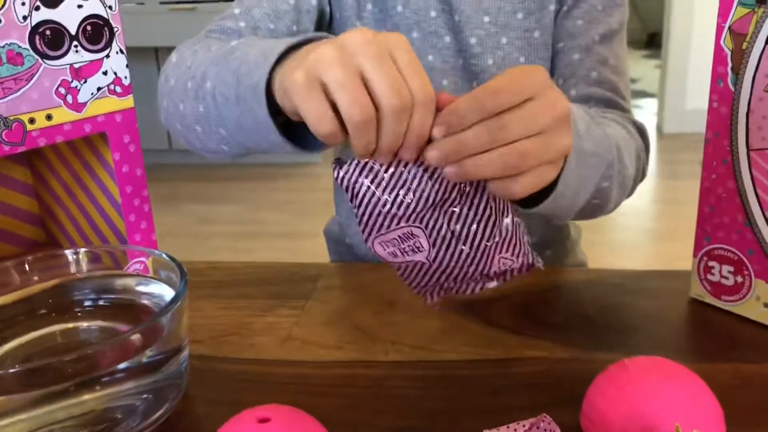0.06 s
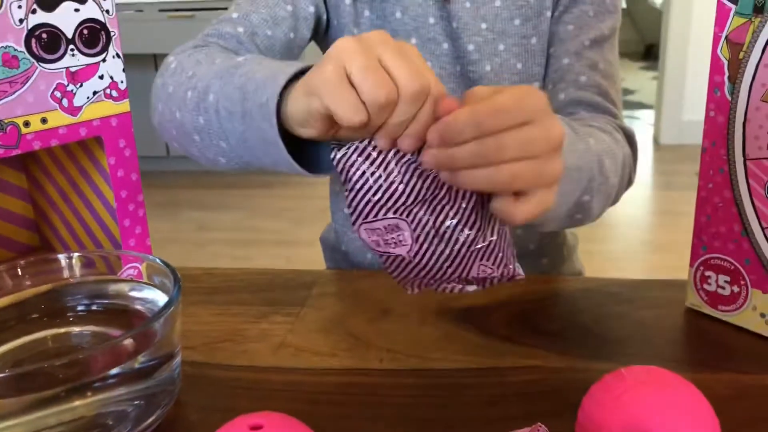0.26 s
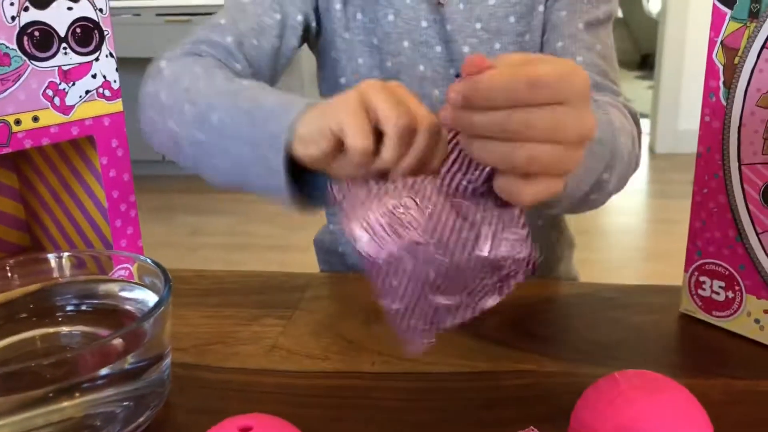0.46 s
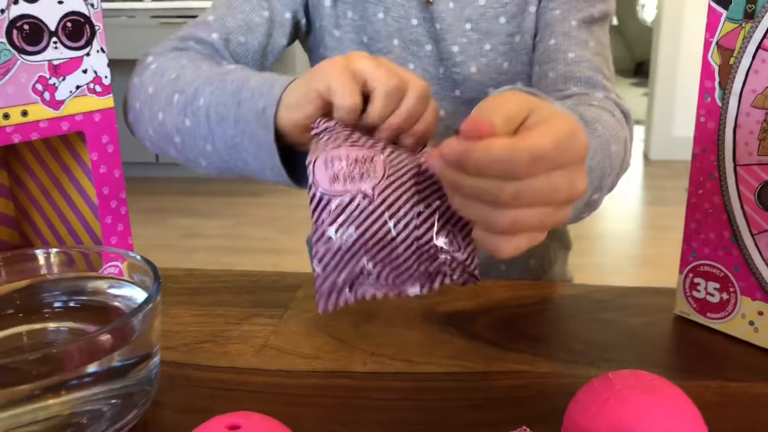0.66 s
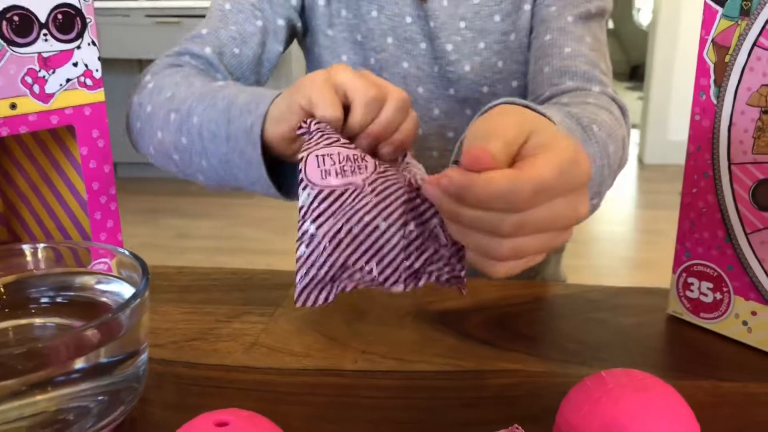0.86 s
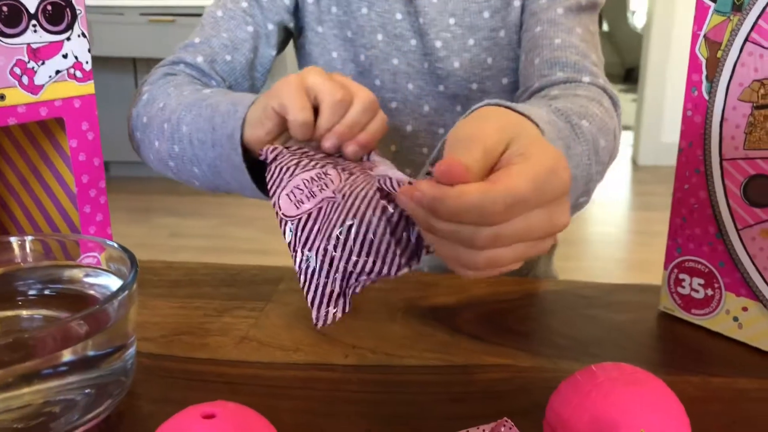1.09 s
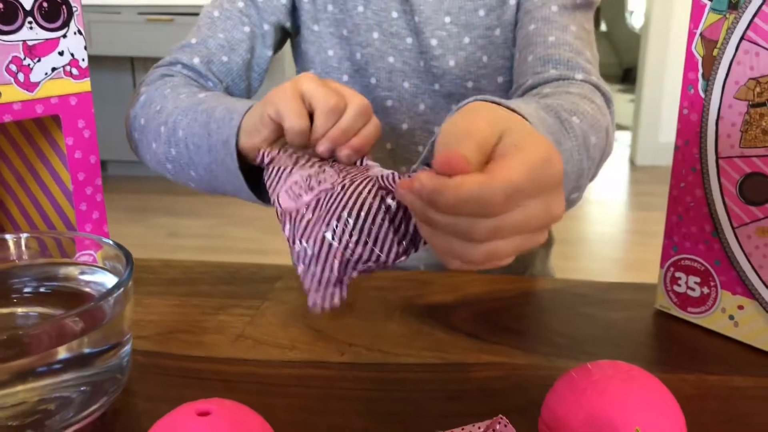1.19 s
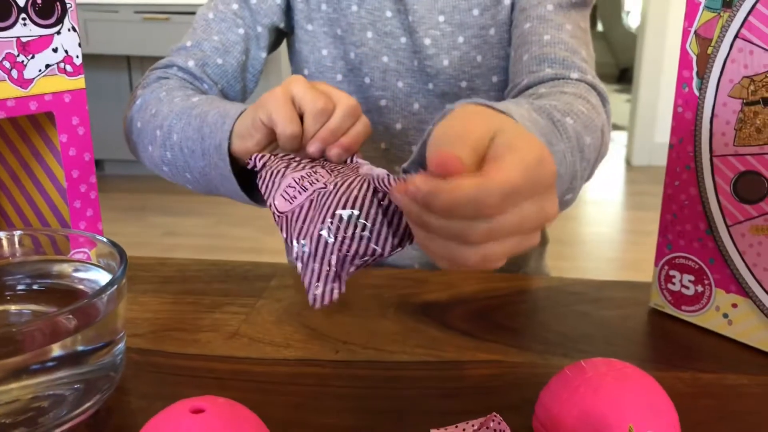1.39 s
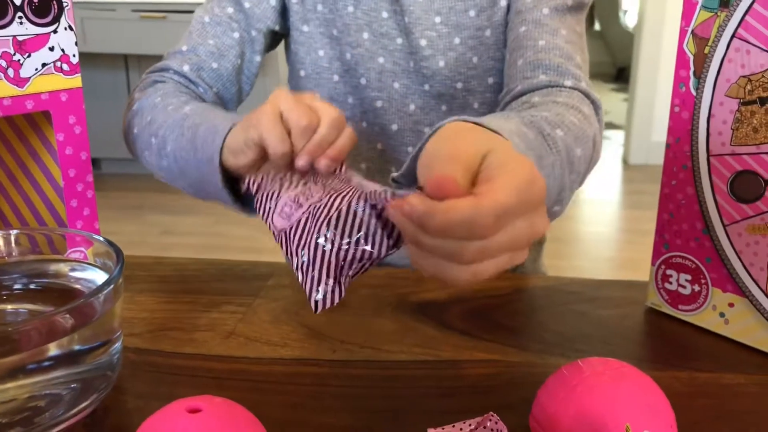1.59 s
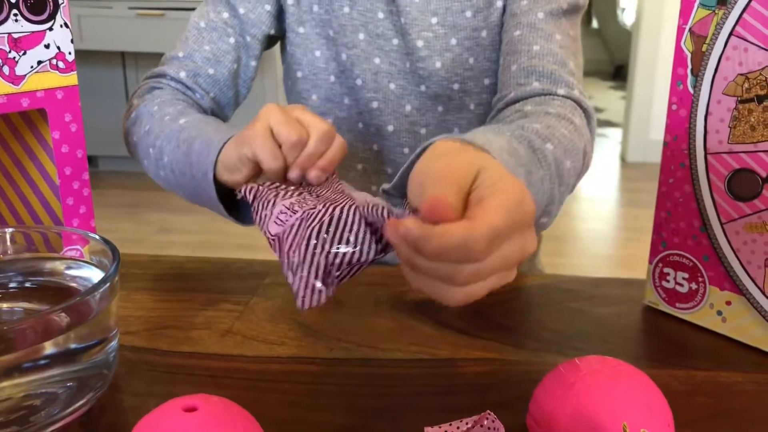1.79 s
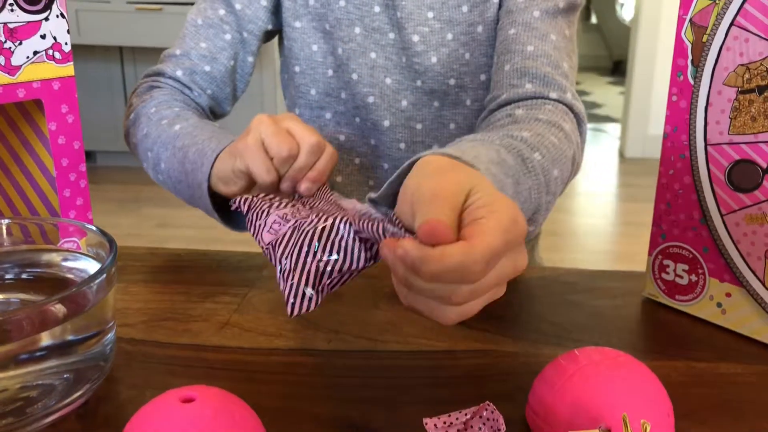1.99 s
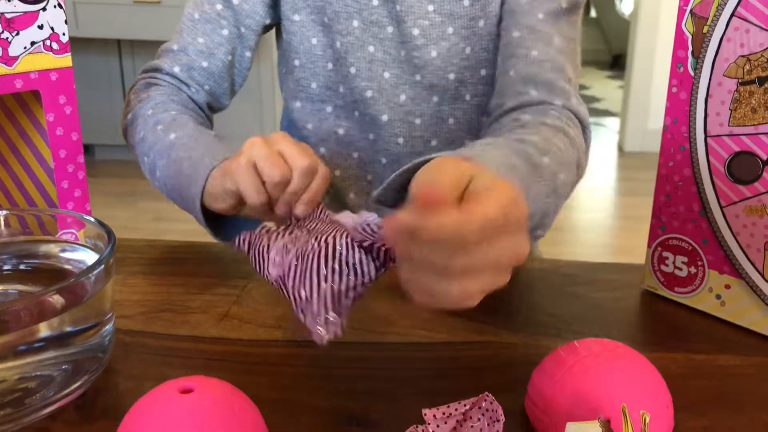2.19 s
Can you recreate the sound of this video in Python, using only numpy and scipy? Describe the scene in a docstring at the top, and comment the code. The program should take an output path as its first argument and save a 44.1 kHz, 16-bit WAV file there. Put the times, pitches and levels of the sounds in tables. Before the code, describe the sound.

A small plastic foil bag crackles in the hands, close up, in a small quiet room with faint low hum. Sparse crisp snaps lead to a short, dense, loud rip at 0.33-0.4 s with a dull thud and hollow film pops. A brief lull, then busy crackling from 0.65, strongest near 0.9, another sharp cluster at 1.2, snaps around 1.6, fading to lighter crinkles and faint pops near 2 s.

```python
"""Two hands pull open a small plastic foil bag in a small room, whose quiet hum is steady filtered noise.
Creases snap from the start, as buckling impulses with noise rings, over a stream of finer crinkling.
At a third of a second the seam rips in a dense run of breaks over a dull thud; around it, walls of the bag
pop as roughened falling tones, sums of sine modes. Snaps and crinkling go on, with more pops near the end.
An early echo and a decaying noise tail answer every sound of the bag."""
import sys
import numpy as np
from scipy import signal
from scipy.fft import rfft, irfft, next_fast_len
from scipy.io import wavfile
from scipy.ndimage import map_coordinates

SR = 44100
rng = np.random.default_rng(int(sys.argv[2]) if len(sys.argv) > 2 else 0)


def master(y):
    """Save y as 16-bit WAV."""
    cut = np.clip(np.atleast_2d(y).T, -1, 1)
    pcm = np.round(cut * 32767)  # scale
    wavfile.write(sys.argv[1], SR, pcm.astype(np.int16))


N = 99225  # samples


def amp(db):
    """Amplitude ratio of a level in decibels."""
    return 10 ** (np.asarray(db) / 20)


def unit(x):
    """Normalise the power: scale to rms 1."""
    return x / np.sqrt(np.mean(x ** 2) + 1e-20)


def along(points, hz):
    """Interpolate (f/Hz, value) points on a logarithmic frequency axis."""
    f, v = np.transpose(points)
    return np.interp(np.log(hz + 1), np.log(f), v)


def add(track, s, sound):
    """Superpose a sound on the track from time s in seconds."""
    i = int(np.clip(round(s * SR), 0, N - 1))
    track[i:i + len(sound)] += sound[:N - i]


def filtered(x, gain):
    """Linear filtering: multiply the spectrum by a gain that depends on frequency."""
    m = next_fast_len(N + SR // 4)  # zero padding
    spectrum = rfft(x, m) * gain(np.fft.rfftfreq(m, 1 / SR))
    return irfft(spectrum, m)[..., :N]


def noise(tone):
    """Coloured noise of rms 1: a white spectrum shaped by a level curve."""
    return unit(filtered(rng.standard_normal(N), lambda hz: amp(along(tone, hz))))


def band(hz, width_hz):
    """Narrow-band noise of rms 1, at half amplitude on the edges of its width."""
    return unit(filtered(rng.standard_normal(N), lambda f: 1 / (1 + (2 * (f - hz) / width_hz) ** 4)))


def causal(x, db):
    """Minimum-phase filtering: the folded cepstrum colours a sound without smearing its attack."""
    cepstrum = irfft(db * np.log(10) / 20)
    cepstrum[1:len(cepstrum) // 2] *= 2
    cepstrum[len(cepstrum) // 2 + 1:] = 0
    return irfft(rfft(x) * np.exp(rfft(cepstrum)), len(x))


def room_tone():
    """Stationary background: broadband air noise plus narrow noise bands whose beating makes the hum waver."""
    # hum bands: f/Hz, width/Hz, level/dB
    hum_bands = [(119.5, 8.3, -60.5), (170.6, 25, -56), (257.4, 31, -53.5)]
    # spectrum of the air noise: f/Hz, level/dB
    air_tone = [(20, -35), (45, -7.5), (95, 6.5), (190, 6), (330, -9.5), (1500, -15), (5000, -20.5),
                (16000, -42)]
    air_db = -53
    hum = sum(amp(db) * band(hz, width) for hz, width, db in hum_bands)
    return hum + amp(air_db) * noise(air_tone)


def room(x):
    """Reverberation: convolution with an early reflection and a diffuse tail whose decay depends on frequency."""
    # reverberation time: f/Hz, T60/s
    decay_times = [(2000, 0.59), (15000, 0.24)]
    # colour of the whole answer: f/Hz, level/dB
    answer_tone = [(1250, -4.5), (1750, 4), (2500, -4.5), (6000, -6.5)]
    tail_db, wall_db = -12, -21.5  # before the colour
    wall_s, onset_s = .0086, 0.00049  # delay of the nearest wall's echo, rise of the tail

    hz, t, grid = signal.stft(rng.standard_normal(SR // 2), SR, nperseg=256)
    decay = amp(-60 * t / along(decay_times, hz)[:, None])
    tail = signal.istft(grid * decay, SR)[1]
    tail = tail * (1 - np.exp(-np.arange(len(tail)) / SR / onset_s))
    answer = amp(tail_db) * tail / np.linalg.norm(tail)
    add(answer, wall_s, [amp(wall_db)])
    wet = signal.fftconvolve(x, answer)[:N]
    return filtered(wet, lambda hz: amp(along(answer_tone, hz)))


def pops(size=4096, count=40):
    """Snap-through: a panel flips and rings in inharmonic membrane modes, rough and falling in pitch."""
    # wall pops: t/s, level/dB (before the overtones and the doubling below), settled f/Hz
    pop_events = [(.28, -36, 376), (.324, -30.5, 403), (.368, -27.5, 440), (1.82, -42.5, 334),
                  (1.993, -43.5, 820), (2.012, -42, 582)]
    t60_s, attack_s, overtone_db = 0.043, .001, -11  # overtone level per octave above the lowest mode
    sharp, settle_s = 0.467, 0.0042  # initial excess of pitch as a fraction, time constant of its fall
    rough_rad = 1  # phase flutter of the lowest mode, in proportion to frequency for the others

    out, t = np.zeros(N), np.arange(size) / SR
    ratios = np.array([[1], [1.59], [2.14], [2.92]])  # membrane modes
    mode_gains = amp(overtone_db * np.log2(ratios))
    envelope = amp(-60 * t / t60_s) * (1 - np.exp(-t / attack_s))
    sagging = t + sharp * settle_s * (1 - np.exp(-t / settle_s))  # integral of the falling pitch
    for s, db, hz in pop_events:
        flutter = np.array([map_coordinates(rng.standard_normal(count + 1), [count * t / t[-1]])
                            for _ in ratios])
        phase = 2 * np.pi * hz * ratios * sagging + rough_rad * ratios * flutter
        modes = mode_gains * np.sin(phase)
        add(out, s, 2 * amp(db) * envelope * modes.sum(0))
    return out


def crease(tone, t60, spike, body_db=0, sheen_db=0, size=2048, count=26):
    """Buckling: two sharp jumps excite a quick flutter with resonances of its own and a longer ring of the bag."""
    ring_t60_s, facet_db = 0.038, 2.5  # ring of the whole bag, spread of each facet's colour
    run_s = 0.0014  # second jump falls within this time; also the rise of the ring
    level_span_s = 0.0055  # span over which the energy makes rms 1

    t, hz = np.arange(size) / SR, np.fft.rfftfreq(size, 1 / SR)
    flutter = rng.standard_normal(size) * amp(-60 * t / t60)
    flutter[:2] += spike * rng.choice([-1, 1]) * np.array([1, -.5])  # the film jumps and springs back
    flutter[1 + int(rng.random() * run_s * SR)] += .5 * spike * rng.standard_normal()  # the crease runs on
    ring = rng.standard_normal(size) * amp(-60 * t / ring_t60_s) * (1 - np.exp(-t / run_s))

    # random resonances, closer together at low frequency
    facet = map_coordinates(rng.standard_normal(count + 1), [count * np.sqrt(hz / hz[-1])], mode="nearest")
    low = 1 / (1 + (hz / 1600) ** 4)
    high = 1 / (1 + (9000 / (hz + 1)) ** 6)
    colour = along(tone, hz) + facet_db * facet * (1 - .5 * low) + body_db * low + sheen_db * high
    ring_colour = colour + 20 * np.log10(low) + body_db - 3.5
    y = causal(flutter, colour) + causal(ring, ring_colour)
    return y / np.sqrt(np.sum(y ** 2) / (level_span_s * SR))


def crackle(start, end, per_s, tone, spread_db):
    """Crackling noise: a jittered stream of tiny creases of random size, rms 1 between start and end."""
    t60_s = .009
    out, number = np.zeros(N), max(int((end - start) * per_s), 1)
    for k, (place, size) in enumerate(rng.random((number, 2))):
        s = start + (end - start) * (k + 2 * place - .5) / number
        level_db = spread_db * min(-np.log(size), np.pi)  # many small breaks, few large
        add(out, s, amp(level_db) * crease(tone, t60_s, spike=1.9))
    return unit(out) * np.sqrt((end - start) * SR / N)


def crinkle():
    """Amplitude modulation: fine crackling follows how hard the fingers work the film."""
    # work of the fingers: t/s, level/dB (before the trim)
    handling = [(0, -54.5), (.3, -60), (.38, -36), (.44, -37), (0.509, -51.5), (.59, -53.5), (.68, -42),
                (.82, -45), (.87, -50.5), (1.17, -46.5), (1.217, -34), (1.29, -50), (1.77, -58.5),
                (1.81, -44.5), (2.19, -62), (2.245, -35)]
    # spectrum of the tiny creases: f/Hz, level/dB
    crinkle_tone = [(50, -41), (300, -5.5), (3500, 3), (8000, -4.5), (16000, -17)]
    trim_db = 0.5
    level_db = np.interp(np.arange(N) / SR, *np.transpose(handling))
    fine = crackle(0, N / SR, per_s=140, tone=crinkle_tone, spread_db=3.5)
    return amp(level_db + trim_db) * fine


def rip():
    """Fracture: the seam tears in a dense run of fibre breaks, with a thud as the hands jerk apart."""
    # spectrum of the breaks: f/Hz, level/dB
    rip_tone = [(60, -14), (280, -4.5), (430, 6), (700, -6), (1500, -0.5), (3800, 8.5), (11000, -1.5),
                (16000, -11)]
    start_s, end_s, attack_s, release_s = .333, .391, 0.0038, .008
    end_db, swell_db = -22, 3.5  # level at the end of the tear, growth up to it
    tug_s, tug_width_s, tug_db = 0.354, 0.012, -42  # thud: centre, Gaussian deviation, peak level

    t = np.arange(N) / SR
    gate = np.clip((t - start_s) / attack_s, 0, 1) * np.exp(-np.maximum(t - end_s, 0) / release_s)
    progress = np.clip((t - start_s) / (end_s - start_s), 0, 1)
    breaks = crackle(start_s, end_s + 2 * release_s, per_s=700, tone=rip_tone, spread_db=2.5)
    tear = amp(end_db + swell_db * (progress - 1.0)) * gate * breaks

    tug = np.exp(-.5 * ((t - tug_s) / tug_width_s) ** 2)
    thud = amp(tug_db) * tug * band(hz=141, width_hz=86)
    return tear + thud


def snaps(count=3):
    """Clustered buckling: each larger crease snaps while weaker neighbouring folds give way around it."""
    # snapping creases: t/s, level/dB (before the trim), body below 1.6 kHz/dB, sheen above 9 kHz/dB
    snap_events = [(0.0354, -30.5, 2.5, 10), (0.0918, -29, 0, 11), (0.1064, -38, -4, -17),
                   (0.112, -30.5, 2.5, 0), (0.163, -36, -18, -7), (0.188, -37.5, -2, 8.5),
                   (0.2129, -35.5, 0, 6), (0.2173, -31.5, 1, -20), (0.2317, -27, 4.5, 1.5),
                   (0.267, -30.5, -4, 11), (0.2795, -29, 5.5, 4.5), (0.322, -18.5, 3, 19.5),
                   (0.3345, -19, 0.5, 7), (0.3492, -21, 4, -2), (0.3763, -22, 4.5, -2),
                   (0.4368, -29.5, 0, 6), (0.445, -28, -3, -14), (0.4553, -29, -4.5, -2),
                   (0.5542, -38, 6.5, -6), (0.613, -38.5, 5, -28), (0.623, -37, -5, 10),
                   (0.6371, -29, 3.5, 2), (0.6612, -33, 5, -17), (0.6682, -25, -4.5, 7.5),
                   (0.6787, -29.5, 3, 8), (0.6969, -31, 7, -6), (0.7457, -33, 3.5, 3),
                   (0.7566, -29.5, -2, 3), (0.7653, -26.5, 5, -1.5), (0.773, -34.5, 8, -6),
                   (0.7925, -31, 2, -12), (0.8039, -26, 2, -2), (0.8068, -27, 4, -8),
                   (0.8255, -24.5, 5.5, 0.5), (0.8337, -28.5, 0, -4), (0.8402, -36, -2, -6),
                   (0.8792, -30, 3, -11), (0.8832, -25, 2, -6), (0.8863, -19, 4, -1),
                   (0.8989, -23, -0.5, -7), (0.9086, -28.5, 3.5, -2), (0.9363, -35, 4.5, -31),
                   (0.9847, -30, 3, -7), (0.9961, -29.5, 1.5, -8), (1.0011, -33, 3, 4),
                   (1.0326, -29.5, 8, 3), (1.0516, -32, -3, -4), (1.058, -37.5, -8, 14),
                   (1.0976, -33.5, -1, 3), (1.1436, -31.5, 1.5, 0), (1.173, -32, 5, -2),
                   (1.2026, -22.5, 8, 6.5), (1.2059, -24, 5, -3), (1.219, -24.5, -5, -18),
                   (1.224, -23, 0, 14), (1.3277, -28, 11.5, 16), (1.4, -39.5, -9, 3),
                   (1.4145, -29, -16, -4), (1.4388, -33.5, 3, -8), (1.504, -41, 1, -4),
                   (1.5269, -39, 2.5, -21), (1.5427, -27, -16, 2.5), (1.5577, -29.5, 1, 7),
                   (1.5888, -23, 3, 16.5), (1.5973, -26.5, 7, 18.5), (1.6082, -37, 3, -8),
                   (1.6235, -25, -12, 6.5), (1.6631, -26, 5.5, 15), (1.681, -37.5, 4.5, -3),
                   (1.7015, -28, 5.5, 6), (1.7385, -25.5, -5, -1), (1.7722, -38, -5, -11),
                   (1.7935, -35, -1, 4), (1.7986, -32, 0, -4), (1.8087, -30, 5.5, -0.5),
                   (1.8604, -31.5, -5, 14), (1.8926, -33.5, -5, -2), (1.9334, -29.5, 2.5, -4),
                   (1.9663, -32.5, -10, 6), (1.975, -33, 1, -3), (1.9924, -37.5, 10.5, 0),
                   (2.038, -32, 6, -5), (2.058, -41, -10, -8), (2.081, -40.5, -12, 8),
                   (2.1571, -37.5, -28, -8), (2.2478, -31, -14, -4)]
    # spectrum common to the snaps: f/Hz, level/dB
    snap_tone = [(50, -31), (300, -11), (900, -10.5), (3200, 3.5), (6500, 4), (16000, -10)]
    trim_db, t60_s, spike = 0.58, 0.011, 3.76  # level trim, flutter of the film, jump over flutter
    lead_s, trail_s = .004, .012  # neighbours lie from this long before to this long after
    neighbour_db, scatter_db = -17, 3.3  # relative to the untrimmed snap, standard deviation

    out = np.zeros(N)
    for s, db, body_db, sheen_db in snap_events:
        add(out, s, amp(db + trim_db) * crease(snap_tone, t60_s, spike, body_db, sheen_db))
        places = (np.arange(count) + rng.random(count)) / count
        delays = places * (lead_s + trail_s) - lead_s
        for delay, offset_db in zip(delays, rng.normal(0, scatter_db, count)):
            add(out, s + delay, amp(db + neighbour_db + offset_db) * crease(snap_tone, t60_s, spike))
    return out


def scene():
    """Superposition: direct sound of the bag, its reverberation and the background, in one channel."""
    background = room_tone()
    bag = pops() + crinkle() + rip() + snaps()
    return (bag + room(bag) + background)[None]


def record(dry):
    """Band limiting: a steep low-pass removes what lies above the recorder's limit."""
    top_hz = 15950  # half-power point
    return filtered(dry, lambda hz: 1 / np.sqrt(1 + (hz / top_hz) ** 120))


dry = scene()
out = record(dry)
master(out)
```